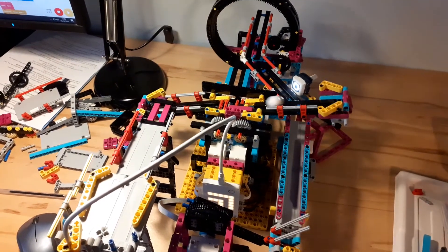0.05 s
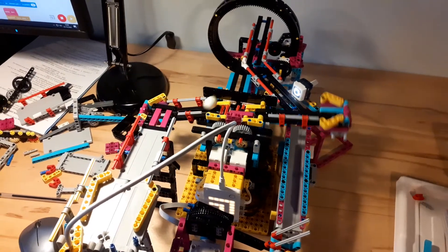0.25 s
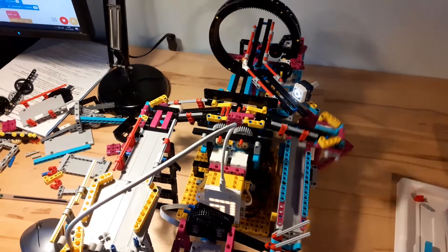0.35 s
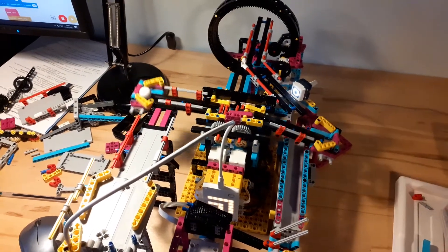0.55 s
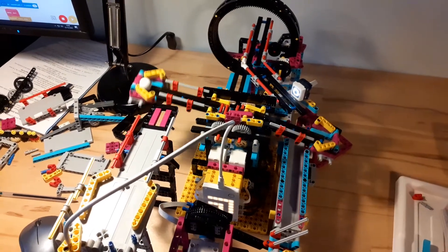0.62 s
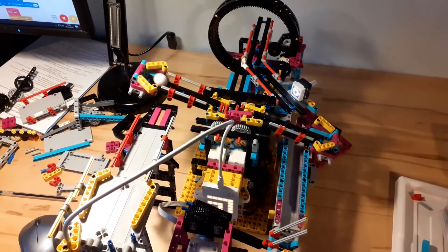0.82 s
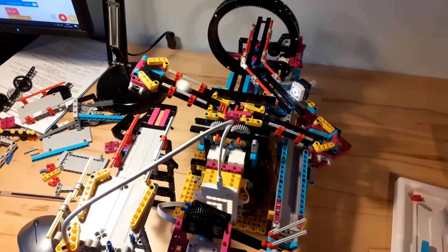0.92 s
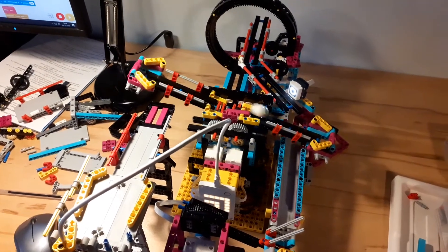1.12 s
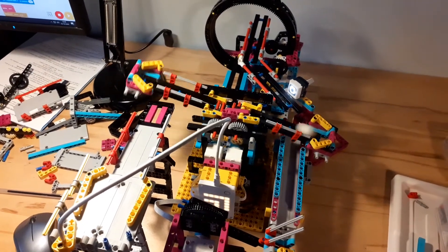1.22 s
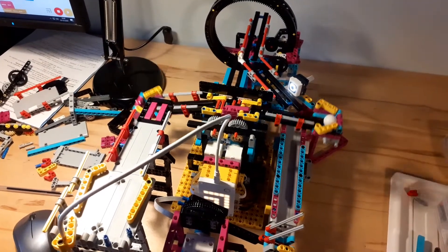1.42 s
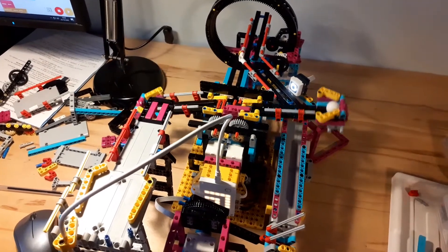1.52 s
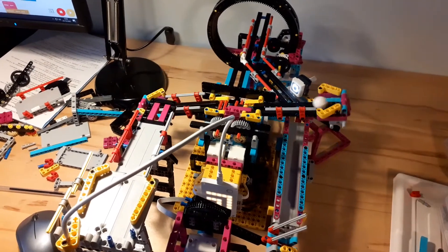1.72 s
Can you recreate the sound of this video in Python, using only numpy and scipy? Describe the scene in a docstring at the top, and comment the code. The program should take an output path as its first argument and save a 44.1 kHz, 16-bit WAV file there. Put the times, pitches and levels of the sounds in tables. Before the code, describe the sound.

A motorised plastic brick machine starts with a thin whine, then whirs and clacks from about 0.2 seconds, loudest near 0.3 and 0.45, with bricks chattering and the desk thudding. It stops with soft bumps around 0.7. A second burst runs from 1.1 to 1.7 seconds, its sharpest clack at 1.3. The sound is close, in a small room with a faint hum.

```python
"""A small geared motor rocks the arm of a plastic brick machine twice, on a wooden desk in a small room.
Each move starts with the thin whine of the motor drive; the gears take up their slack and whir, the shaft
shakes the desk, and the arm clacks against its stops, loose bricks chattering after every blow.
Heard from a stereo microphone close by, with a short room tail and faint air and hum behind."""
import sys
import numpy as np
from scipy import signal
from scipy.fft import rfft, irfft
from scipy.io import wavfile
from scipy.ndimage import uniform_filter1d

SR = 44100
rng = np.random.default_rng(int(sys.argv[2]) if len(sys.argv) > 2 else 0)


def wav_record(signal):
    """Record a signal, one row per channel, as 16-bit PCM in the file named by sys.argv[1]."""
    frames = np.transpose(np.atleast_2d(signal))
    bounded = np.clip(frames, -1, 1)
    # unit amplitude maps onto the largest positive 16-bit level
    quanta = np.round(bounded * 32767).astype(np.int16)
    wavfile.write(sys.argv[1], SR, quanta)


N = 77175

# the motor at work (time [s], desk shaking [dB], gear whir [dB])
MOTOR_LEVELS = [(.16, -85, -80), (.178, -48.5, -61.5), (.33, -51, -55), (.43, -57, -58), (.52, -80, -55.5),
                (.59, -54.5, -58), (.725, -60.5, -57), (.745, -59, -76), (.9, -73, -98),
                (1.015, -79.5, -78), (1.065, -69, -68.5), (1.09, -46.5, -63), (1.27, -57.5, -58.5),
                (1.61, -57.5, -60), (1.66, -55, -71.5), (1.75, -64.5, -73.5)]


def amp(db):
    """Decibels to gain."""
    return 10 ** (np.asarray(db) / 20)


def unit(x):
    """Scale to rms 1."""
    return x / np.sqrt(np.mean(x ** 2))


def energy_one(x):
    """Scale each channel to energy 1."""
    return x / np.sqrt(np.sum(x ** 2, axis=-1, keepdims=True))


def attack_level(x, db, size=SR // 50):
    """Set the rms of each channel's opening samples, 20 ms by default."""
    return x * amp(db) / np.sqrt(np.mean(x[:, :size] ** 2, axis=1, keepdims=True))


def curve(table, column=1):
    """One column of a timed table at every sample."""
    rows = np.array(table)
    return np.interp(np.arange(N) / SR, rows[:, 0], rows[:, column])


def add(out, at, x):
    """Mix a sound in at a time in seconds."""
    i = max(int(at * SR), 0)
    out[:, i:i + x.shape[-1]] += x[:, :N - i]


def through(x, response):
    """Pass sound through an impulse response; channels x samples."""
    return signal.fftconvolve(np.atleast_2d(x), np.atleast_2d(response), axes=1)[:, :x.shape[-1]]


def colour(x, points, size=2048):
    """Minimum-phase filter through (frequency [Hz], gain [dB]) points."""
    hz, db = np.array(points).T
    grid = np.maximum(np.arange(size // 2 + 1) * SR / size, 1)
    cepstrum = irfft(np.log(amp(np.interp(np.log(grid), np.log(hz), db))))
    cepstrum[1:size // 2] *= 2
    cepstrum[size // 2 + 1:] = 0
    return through(x, irfft(np.exp(rfft(cepstrum))))


def decay(t, t60):
    """A fade of 60 dB every t60 seconds."""
    return np.exp(-np.log(1000) * t / t60)


def ring(modes, phases, size=SR // 2):
    """Impulse response of a set of decaying modes."""
    t = np.arange(size) / SR
    return energy_one(sum(amp(db) * np.sin(2 * np.pi * hz * t + phase) * decay(t, t60)
                          for (hz, db, t60), phase in zip(modes, phases)))


def stereo_noise(size, spread=2.8):
    """White noise, partly alike left and right; more spread is wider."""
    return rng.standard_normal(size) + spread * rng.standard_normal((2, size))


def room_tone(air_db=-75, hum_hz=117.9, hum_db=-71.5):
    """Faint air noise at the microphone and a low, steady hum."""
    # spectrum of the air (frequency [Hz], gain [dB])
    air_colour = [(25, -9.5), (300, -6), (2000, -27.5), (16000, -33.5)]
    air = unit(colour(stereo_noise(N, spread=2.2), air_colour))
    hum = np.sqrt(2) * np.sin(2 * np.pi * hum_hz * np.arange(N) / SR)
    return amp(air_db) * air + amp(hum_db) * hum


def drive_whine(turns, drive_hz=1194, flutter_depth=0.61, level_db=-63):
    """Current pulses make the windings sing; under load the fundamental takes over and flutters."""
    # the drive's effort (time [s], level relative to full [dB])
    effort_db = [(0, -52), (.07, -14), (.155, -4.5), (.29, -1.5), (.42, -5), (.72, -5), (.8, -39.5),
                 (.99, -35), (1.05, -7.5), (1.12, -3), (1.58, -5.5), (1.68, -20)]
    # drive harmonics (multiple, relative level at full effort [dB], growth [dB per dB of effort])
    harmonics = [(1, 8.5, 3), (2, 2, 1.9), (3, -16, 1.5)]
    t = np.arange(N) / SR
    effort = amp(curve(effort_db))
    whine = 0
    for k, db, growth in harmonics:
        waver = unit(uniform_filter1d(uniform_filter1d(rng.standard_normal(N), size=250), size=250))
        flutter = 1 + flutter_depth * effort * (waver + np.cos(2 * np.pi * turns))
        whine += amp(db) * effort ** growth * flutter * np.sin(2 * np.pi * k * drive_hz * t)
    return whine * amp(level_db)


def gear_whir(teeth_per_s=6400, scatter_db=3):
    """Dense ticks of gear teeth ringing in the housing."""
    # resonance of the housing (frequency [Hz], gain [dB])
    housing = [(200, -16.5), (500, 7), (1950, 3), (2370, 9.5), (2800, 2.5), (4900, -0.5), (6300, 1.5),
               (9000, 3.5), (10600, -7), (12500, -4), (16000, -14)]
    teeth = (rng.random(N) < teeth_per_s / SR) * amp(scatter_db * rng.standard_normal(N))
    ticks = teeth * stereo_noise(N)
    return unit(colour(ticks, housing)) * amp(curve(MOTOR_LEVELS, column=2))


def desk(push_s, low_cut_hz=91.4):
    """The wooden desk's answer to one push; a longer push is duller."""
    # modes of desk and chassis (frequency [Hz], level [dB], t60 [s])
    modes = [(91.5, -8, 0.095), (109.1, -5, 0.12), (170.5, -6.5, 0.13), (207, 0.5, 0.067), (246.3, 2, 0.14),
             (309.6, 1, 0.089), (339.3, 2.5, 0.17), (435.2, -2, 0.12), (648.5, -4, 0.29)]
    t = np.arange(SR // 2) / SR
    answer = through(np.exp(-t / push_s), ring(modes, np.pi * np.arange(len(modes))))
    return signal.sosfilt(signal.butter(3, low_cut_hz, "high", fs=SR, output="sos"), answer)


def shaft_rumble(turns, jitter_turns=0.055, scatter_db=6, limp=0.5):
    """The shaft nudges the desk once a turn, unevenly, with a limp between harder and softer."""
    # how well the motor reaches the desk's modes (frequency [Hz], gain [dB])
    coupling = [(105, 6.5), (240, -5.5), (340, -2.5), (700, -21)]
    wood = colour(desk(push_s=0.0011), coupling)
    starts = np.flatnonzero(np.diff(np.floor(turns)) > 0)
    slip, force = rng.standard_normal((N // 100, 2)).T
    pushes = np.zeros(N)
    for k, (start, gap) in enumerate(zip(starts, np.diff(starts))):
        place = int(np.clip(start + jitter_turns * gap * slip[k], 0, N - 1))
        pushes[place] += amp(scatter_db * force[k]) * (1 + limp * (-1) ** k)
    rumble = unit(through(pushes, wood))
    power = uniform_filter1d(rumble ** 2, size=SR // 25) + 1e-2  # to even out the level over 40 ms
    return rumble / np.sqrt(power) * amp(curve(MOTOR_LEVELS))


def contacts(size, per_s=9000):
    """A run of tiny random contacts between loose parts."""
    touching = rng.random(size) < per_s / SR
    touching[0] = True
    return touching * stereo_noise(size)


def brick_ring(detune=0.02, scatter_db=1, t60=0.024, ring_db=-10.5):
    """A hard contact and the ring of the struck bricks; every part rings a little differently."""
    # modes of bricks and beams (frequency [Hz], level [dB])
    bricks = [(1560, 4), (2400, 1), (3150, -5), (4650, 1), (6150, -3), (7200, -6), (7835, -2.5)]
    chance = rng.standard_normal((len(bricks), 2))
    modes = [(hz * (1 + detune * a), db + scatter_db * b, t60)
             for (hz, db), (a, b) in zip(bricks, chance)]
    phases = rng.uniform(0, 2 * np.pi, (len(bricks), 2, 1))
    body = amp(ring_db) * ring(modes, phases, size=SR // 10)
    body[:, 0] += 1  # the contact itself
    return body


def judder(size, per_s=200, settle_s=0.031):
    """A push on the desk, then uneven smaller ones as the chassis settles."""
    rebounds = (rng.random(size) < per_s / SR) * rng.uniform(-1.02, 1, size)
    pushes = rebounds * np.exp(-np.arange(size) / SR / settle_s)
    pushes[0] = 1
    return pushes


def blows(wood, click_s=0.004, chatter_s=0.0054, rattle_s=0.038, rattle_db=-21, knock_s=0.019):
    """Each blow clicks, sets the bricks chattering, knocks the frame and thuds into the desk."""
    # blows in the mechanism (time [s], thud [dB], knock [dB], chatter [dB], click [dB])
    hits = [(0.1631, -64.5, -66, -55, -51), (0.2142, -45.5, -48.5, -46, -46),
            (0.3058, -41.5, -39.5, -41, -45.5), (0.4399, -54, -59, -51, -57),
            (0.4532, -46, -49, -35, -30.5), (.47, -41.5, -49.5, -53, -70), (0.5224, -48.5, -57, -49.5, -52),
            (1.075, -52.5, -72, -51, -52.5), (1.0834, -56, -76, -50.5, -49), (1.1301, -55, -69, -55, -57),
            (1.1855, -45.5, -53, -46.5, -49.5), (1.294, -45, -49, -36, -32.5), (1.3561, -53, -59, -47, -50),
            (1.46, -51.5, -70, -54.5, -65), (1.483, -52, -61, -50.5, -49), (1.5655, -53.5, -65, -55.5, -60)]
    # spectra of the crisp click, the bricks and the frame (frequency [Hz], gain [dB])
    click_colour = [(2500, -39), (4500, -3.5), (6300, -4), (7500, -1.5), (9200, -3.5), (10700, -12),
                    (12500, -5), (16000, -20.5)]
    chatter_colour = [(900, -35), (2400, 0.5), (5200, 3.5), (10000, -42.5)]
    knock_colour = [(180, -31.5), (380, 2.5), (650, 0), (1600, -2.5), (2200, -11), (5000, -57)]
    clacks, thuds = np.zeros((2, N)), np.zeros((1, N))
    t = np.arange(SR // 4) / SR
    burst_and_rattle = np.exp(-t / chatter_s) + amp(rattle_db) * np.exp(-t / rattle_s)
    for at, thud_db, knock_db, chatter_db, click_db in hits:
        touches, part = contacts(len(t)), brick_ring()
        click = colour(through(touches * np.exp(-t / click_s), part), click_colour)
        chatter = colour(through(touches * burst_and_rattle, part), chatter_colour)
        knock = colour(touches * np.exp(-t / knock_s), knock_colour)
        for sound, db in (click, click_db), (chatter, chatter_db), (knock, knock_db):
            add(clacks, at, attack_level(sound, db))
        thud = through(judder(len(t)), wood)
        add(thuds, at, attack_level(thud, thud_db, size=SR // 25))
    return clacks, thuds


def beam_rattle(rattle_s=0.028):
    """The arm lands on a stop and sets its long beam rattling."""
    # landings of the arm (time [s], level [dB])
    landings = [(0.3053, -49.5), (1.1858, -55), (1.294, -50.5)]
    # modes of the long beam (frequency [Hz], level [dB], t60 [s])
    modes = [(822.5, 4, .13), (968, -1, 0.027), (1094, 0.5, 0.027)]
    rattles = np.zeros((2, N))
    t = np.arange(SR // 4) / SR
    for at, db in landings:
        beam = ring(modes, rng.uniform(0, 2 * np.pi, len(modes)))
        touches = contacts(len(t)) * np.exp(-t / rattle_s)
        add(rattles, at, attack_level(through(touches, beam), db))
    return rattles


def brake_bumps(wood, cutoff_hz=112):
    """Soft, dull bumps in the desk as the arm brakes."""
    # braking bumps (time [s], level [dB])
    brakings = [(0.673, -55.5), (.725, -57), (1.598, -54.5)]
    bumps = np.zeros((1, N))
    bump = signal.sosfilt(signal.butter(2, cutoff_hz, fs=SR, output="sos"), wood)
    for at, db in brakings:
        add(bumps, at, attack_level(bump, db))
    return bumps


def small_room(early_s=0.0089, t60=0.39, treble_t60=0.29, treble_hz=8000):
    """Early reflections from desk and wall, then a tail whose treble dies sooner."""
    t = np.arange(SR) / SR
    arrival = np.clip((t - .002) / 0.0006, 0, 1)  # 2 ms behind the direct sound
    reflections = rng.standard_normal((2, SR)) * (rng.random((2, SR)) < .05)
    early = reflections * np.exp(-t / early_s)
    noise = rng.standard_normal((2, SR))
    low = signal.sosfiltfilt(signal.butter(2, treble_hz, fs=SR, output="sos"), noise)
    tail = low * decay(t, t60) + (noise - low) * decay(t, treble_t60)
    return energy_one(early * arrival), energy_one(tail * arrival)


def stereo_lean(plastic):
    """At the microphone, some bands of the plastic sounds lean left and others right."""
    # stereo balance (frequency [Hz], left minus right [dB])
    balance = [(1200, -1.5), (2800, 0.5), (5500, 5.5), (8000, 0), (13000, -3.5)]
    return np.vstack([colour(channel, [(hz, side * db / 2) for hz, db in balance])
                      for channel, side in zip(plastic, (1, -1))])


def scene(early_db=-13.5, tail_db=-4, desk_tail_db=-9.5):
    """The machine from close by: plastic and desk sound into the room, the whine stays dry and central."""
    # shaft speed (time [s], rate [turns/s])
    speed = [(.8, 119.7), (1.1, 112.9), (1.3, 110)]
    turns = np.cumsum(curve(speed)) / SR
    early, tail = small_room()
    wood = desk(push_s=0.0014)
    clacks, thuds = blows(wood)
    plastic = clacks + beam_rattle() + gear_whir()
    plastic += through(plastic, amp(early_db) * early + amp(tail_db) * tail)
    low = thuds + brake_bumps(wood) + shaft_rumble(turns)
    low_tail = amp(desk_tail_db) * through(low, tail + tail.mean(axis=0))  # narrower in the bass
    return stereo_lean(plastic) + low + low_tail + drive_whine(turns) + room_tone()


def record(dry, top_hz=16000):
    """The recorder cuts the top treble steeply."""
    return signal.sosfilt(signal.ellip(10, .2, 70, top_hz, fs=SR, output="sos"), dry)


dry = scene()
out = record(dry)
wav_record(out)
```